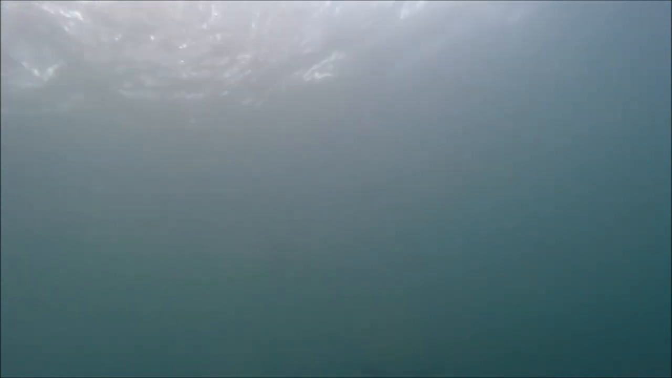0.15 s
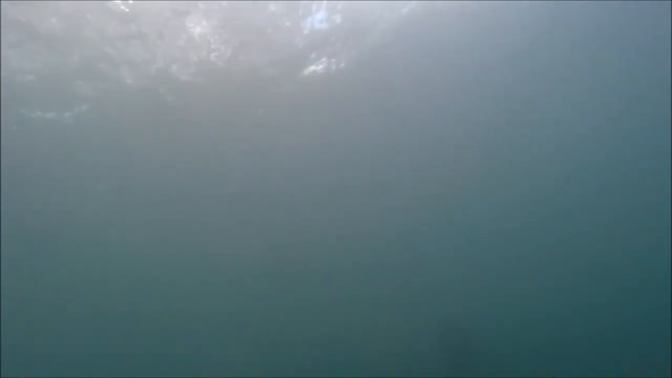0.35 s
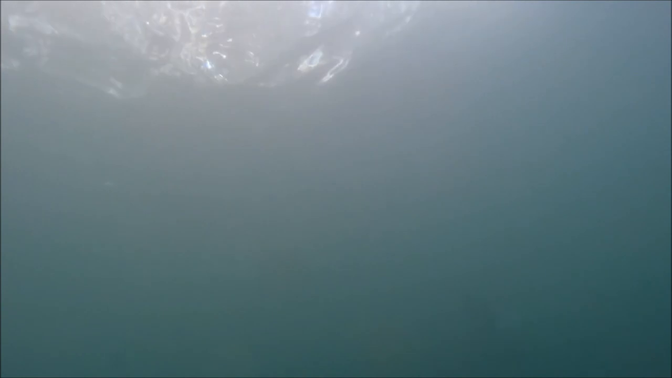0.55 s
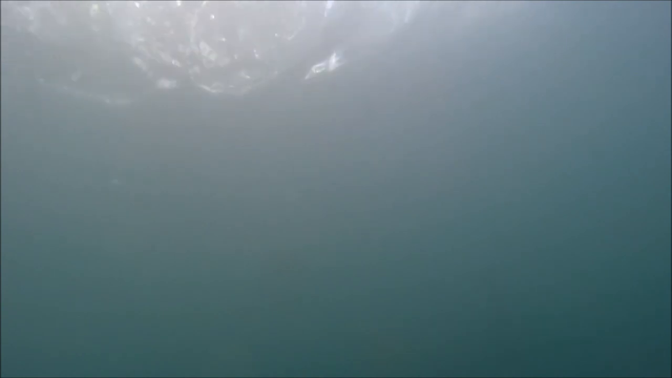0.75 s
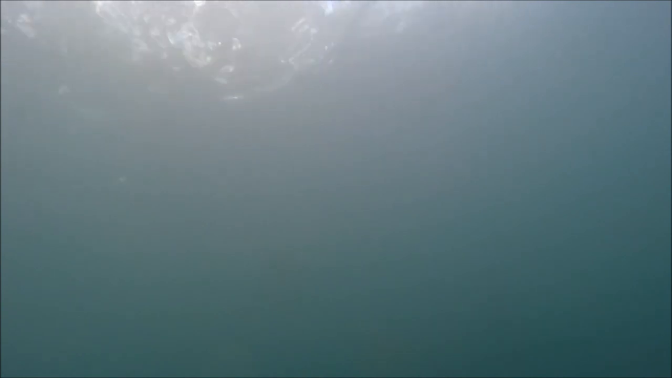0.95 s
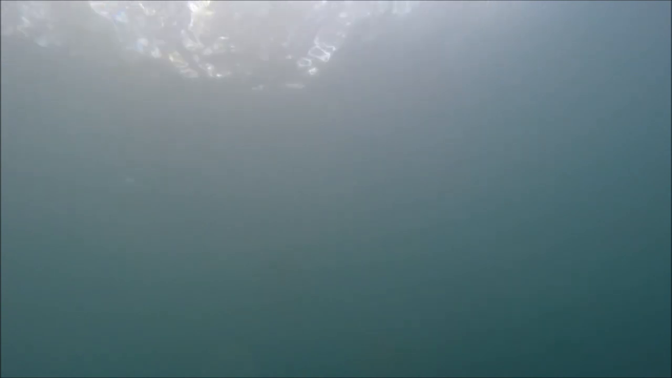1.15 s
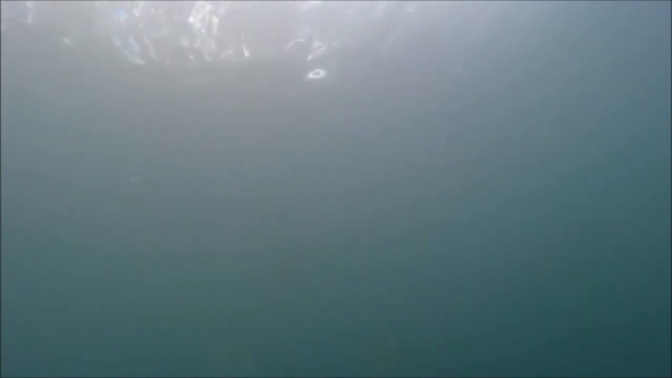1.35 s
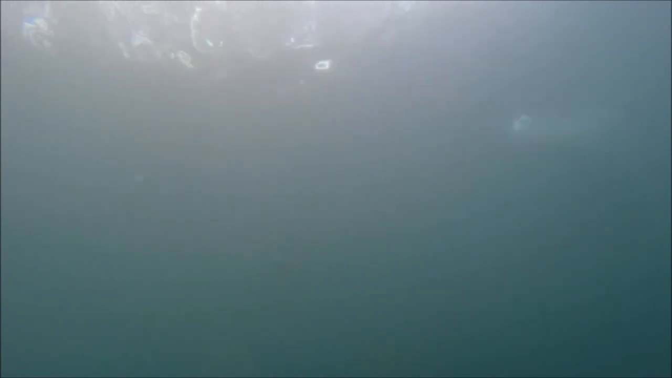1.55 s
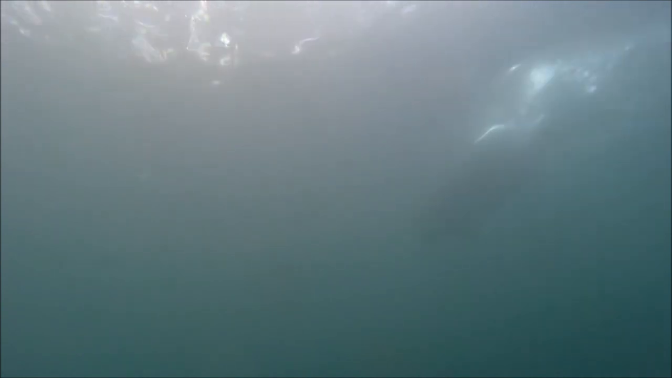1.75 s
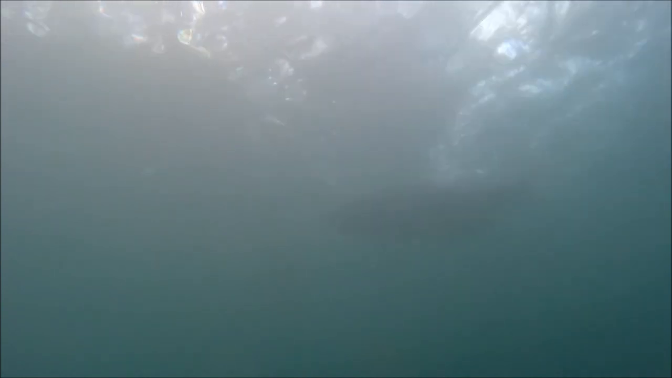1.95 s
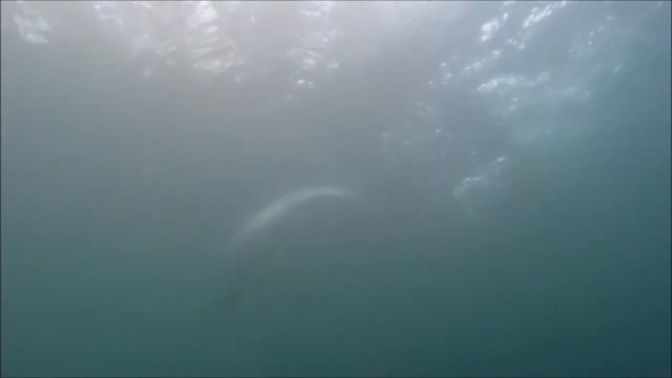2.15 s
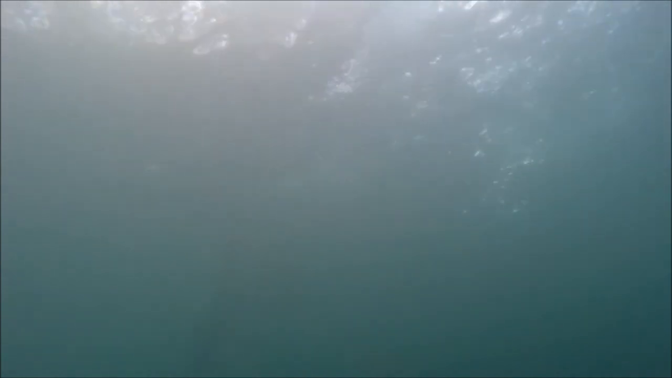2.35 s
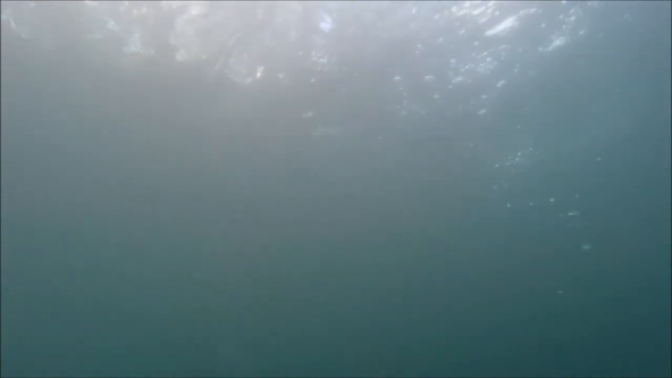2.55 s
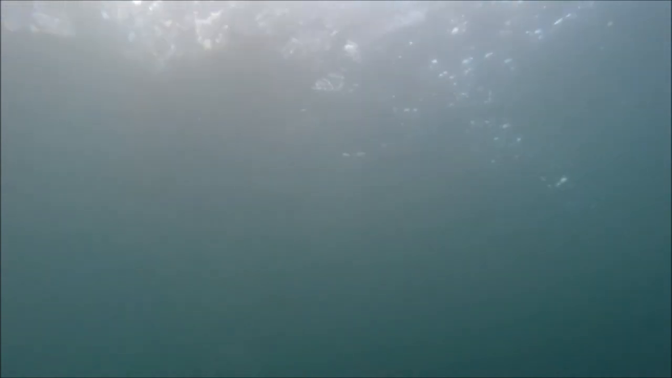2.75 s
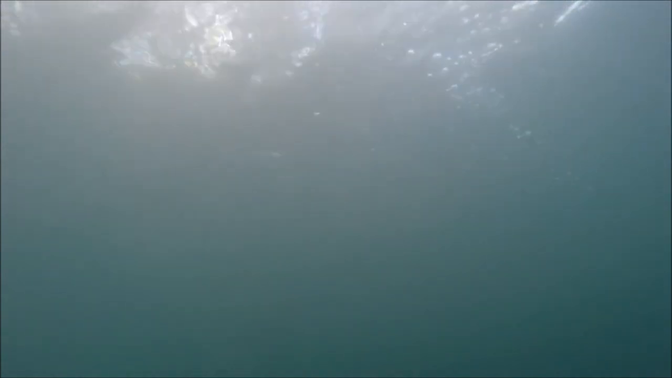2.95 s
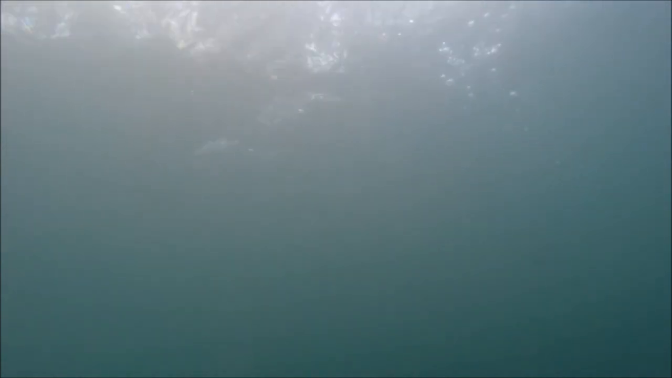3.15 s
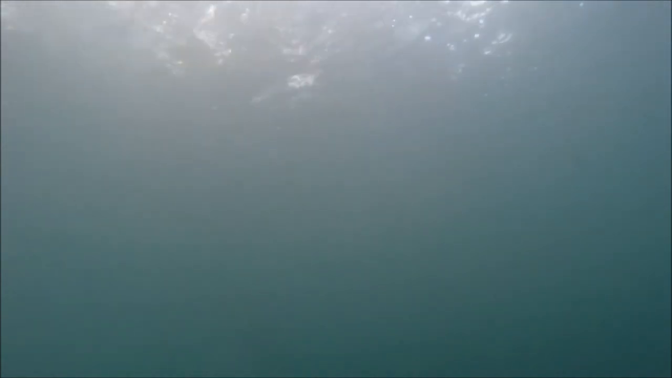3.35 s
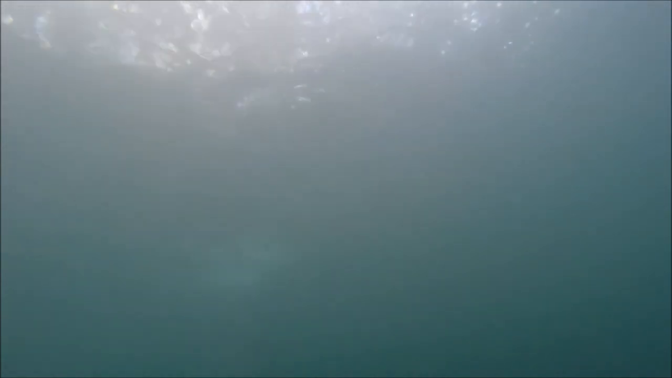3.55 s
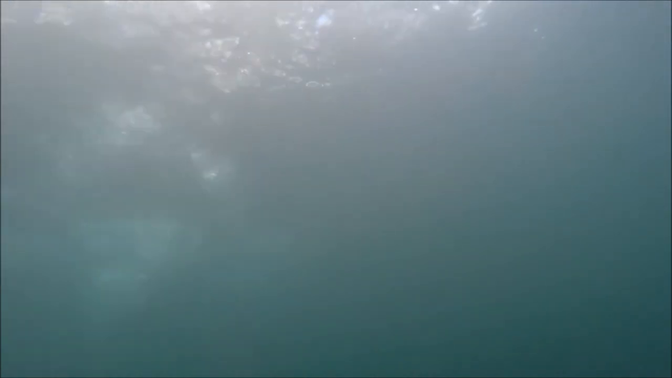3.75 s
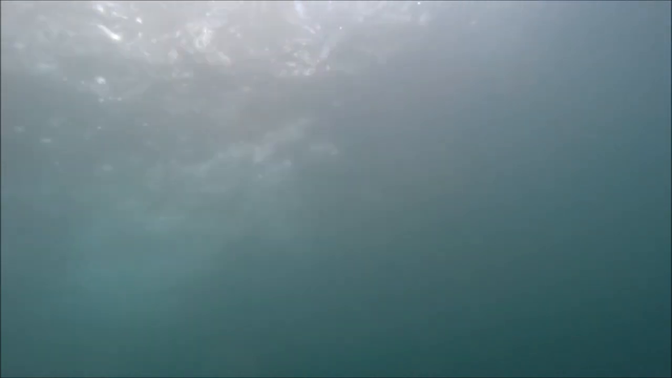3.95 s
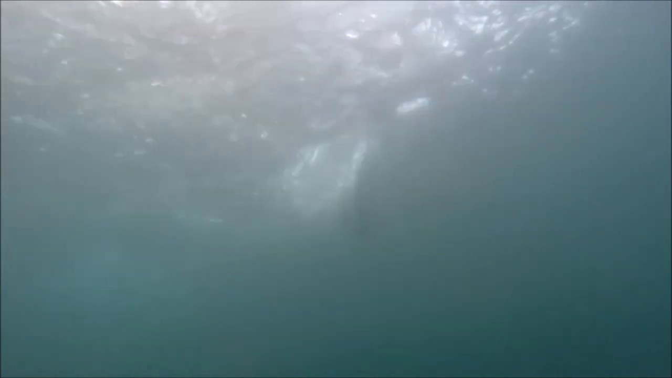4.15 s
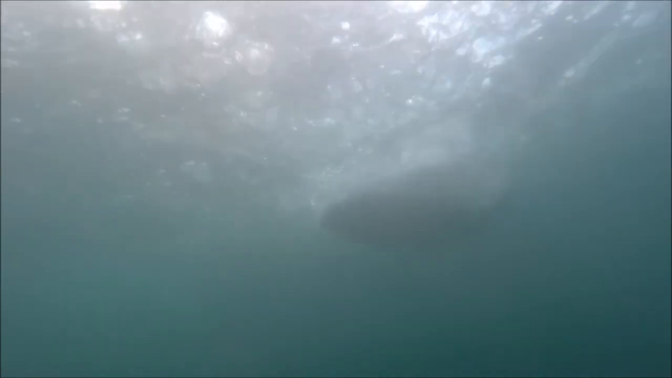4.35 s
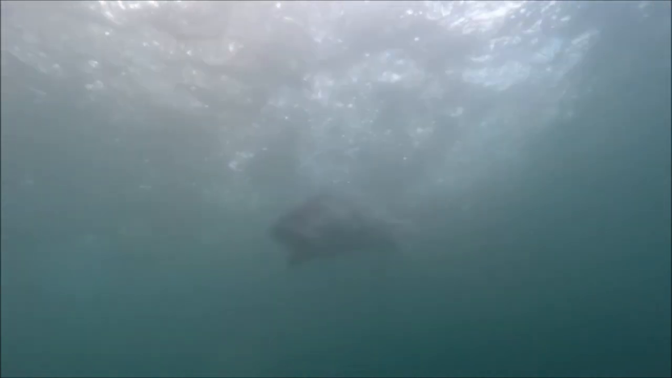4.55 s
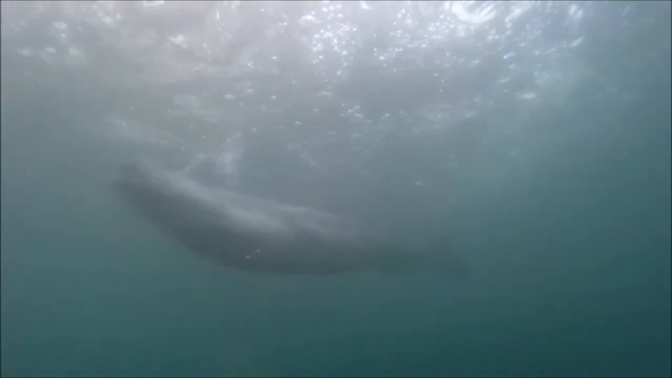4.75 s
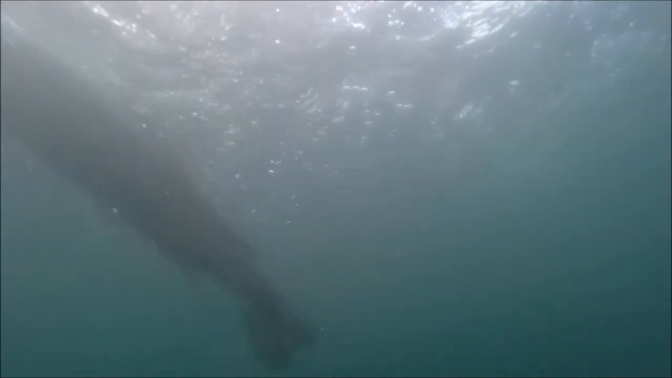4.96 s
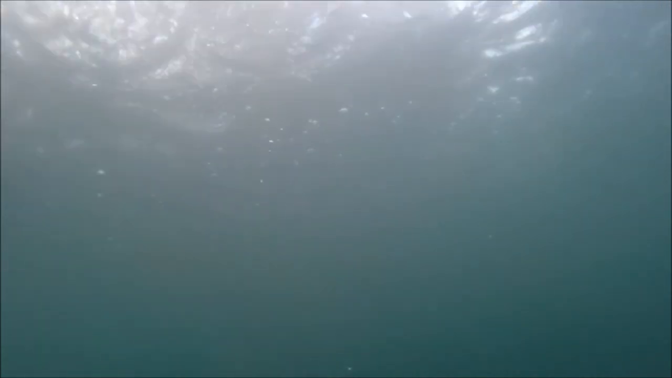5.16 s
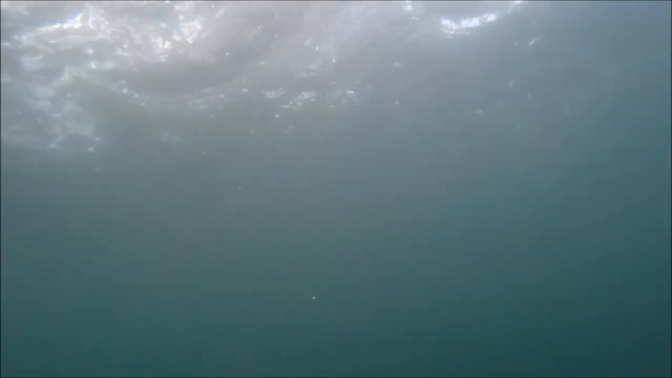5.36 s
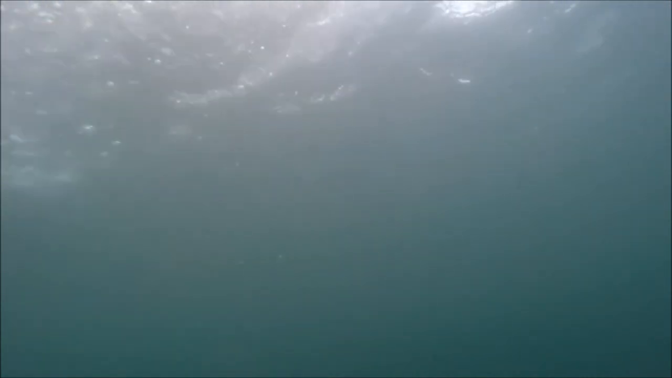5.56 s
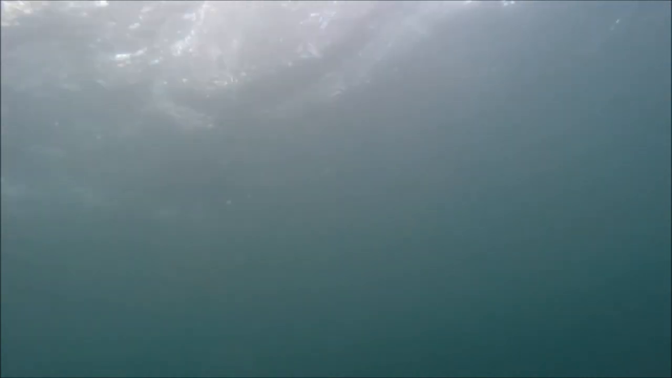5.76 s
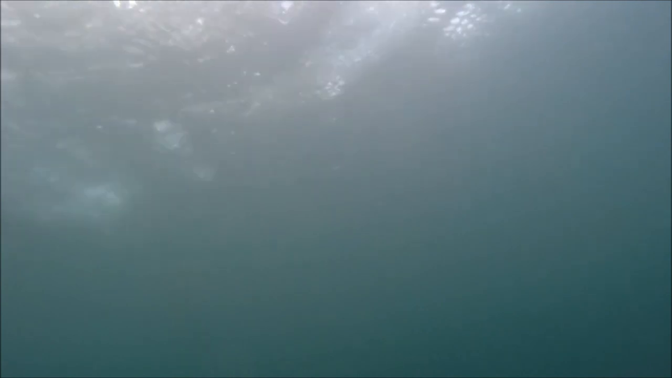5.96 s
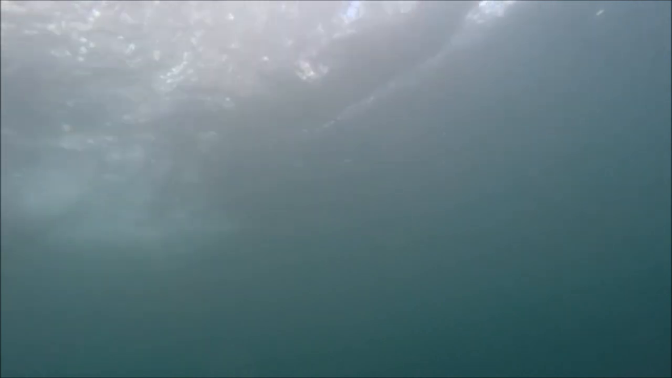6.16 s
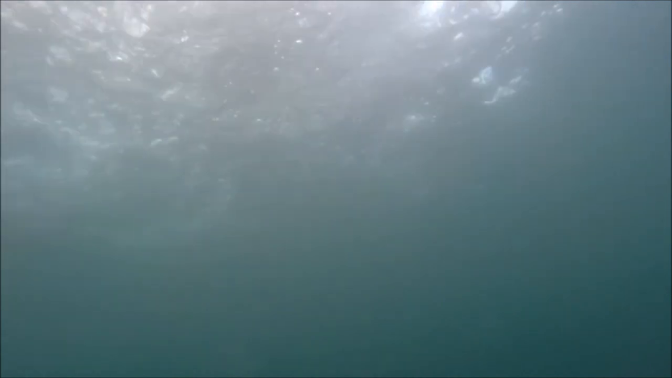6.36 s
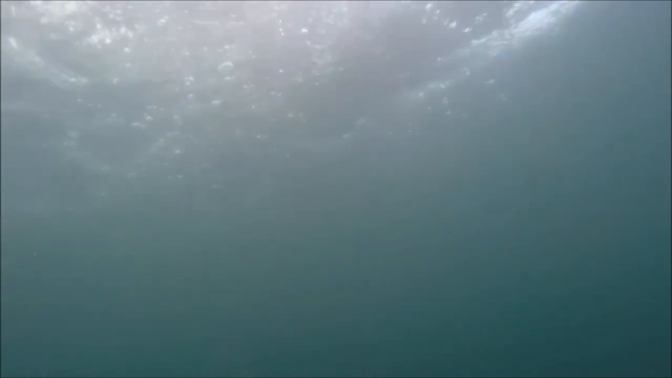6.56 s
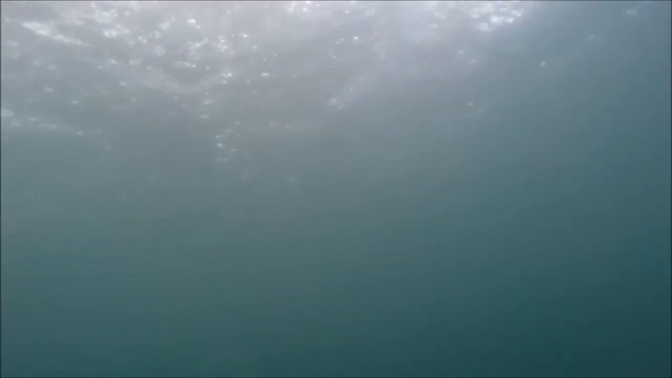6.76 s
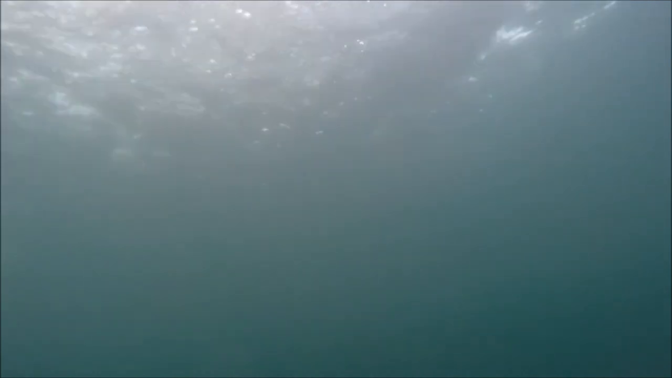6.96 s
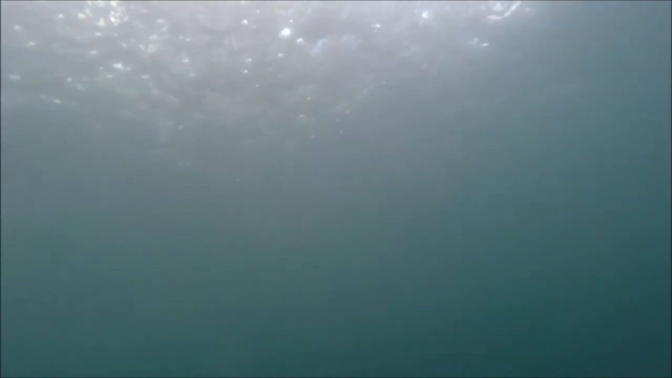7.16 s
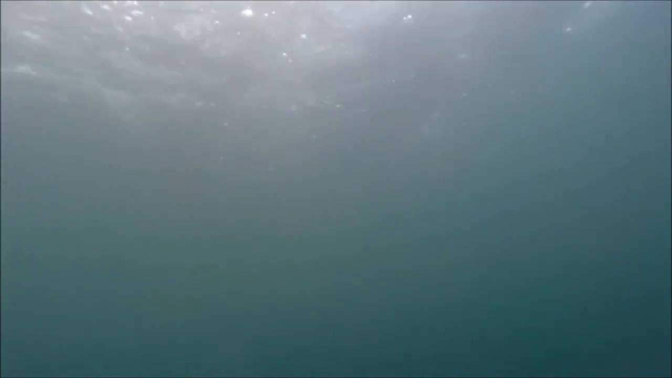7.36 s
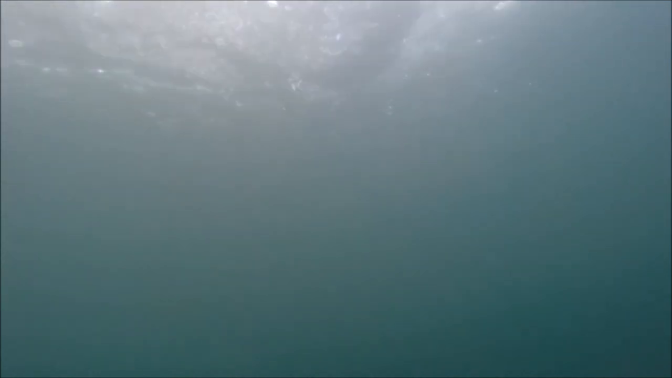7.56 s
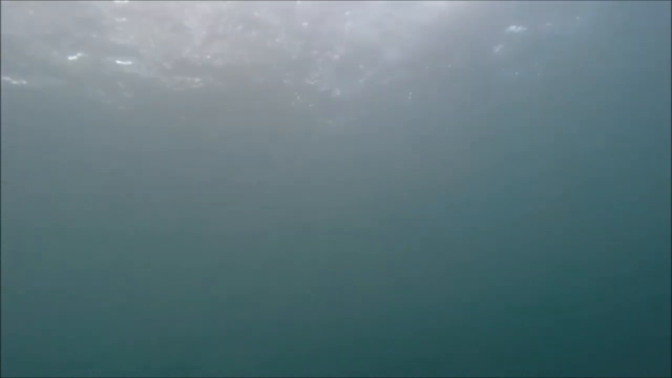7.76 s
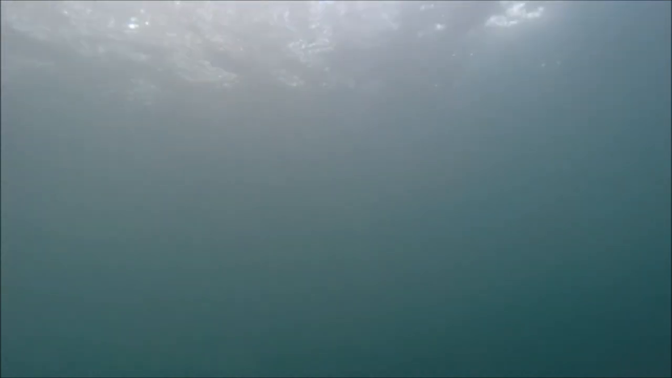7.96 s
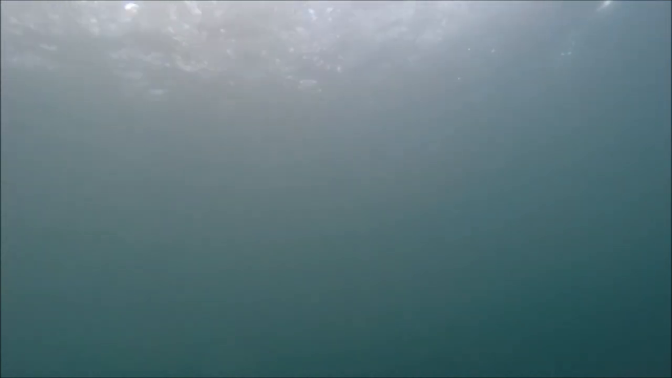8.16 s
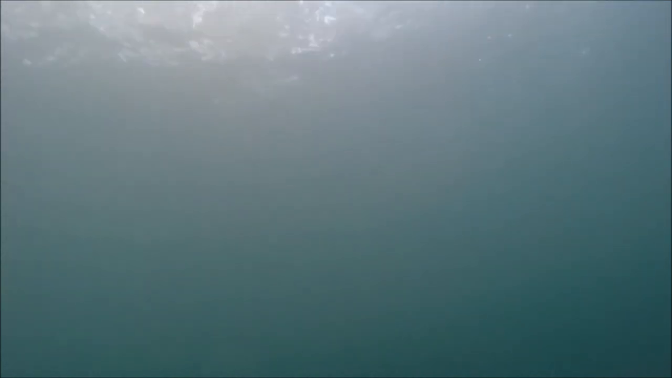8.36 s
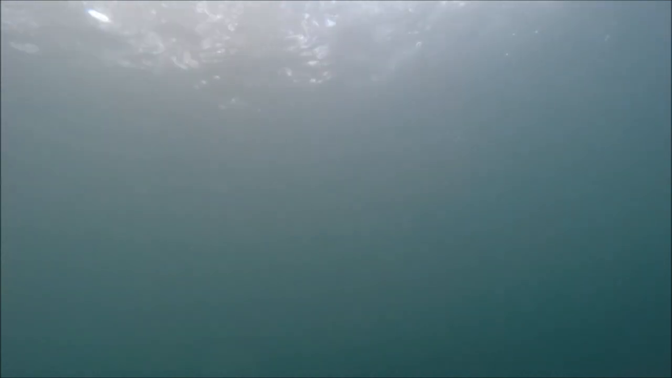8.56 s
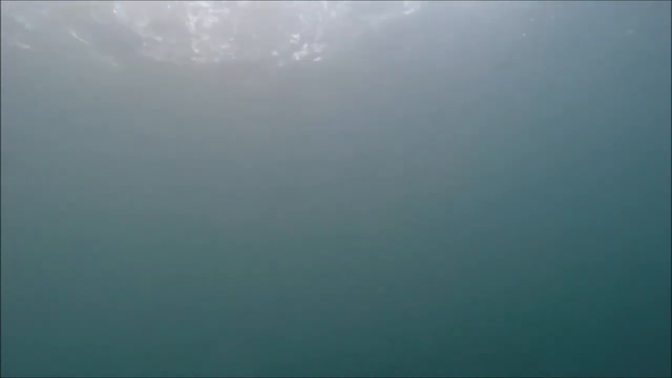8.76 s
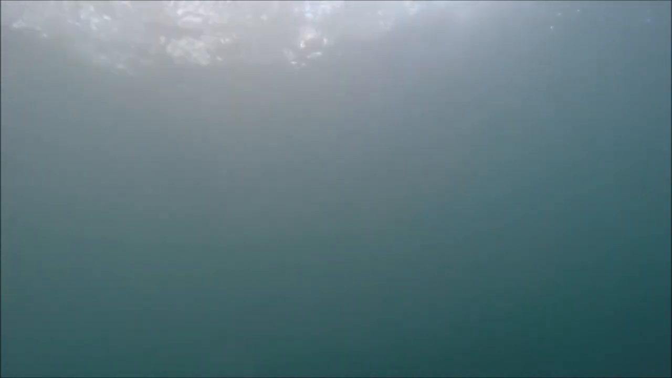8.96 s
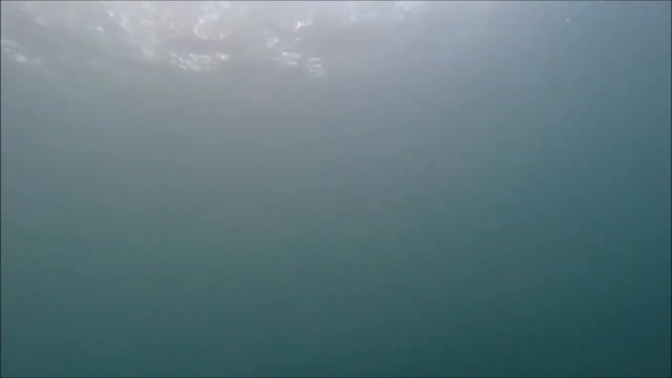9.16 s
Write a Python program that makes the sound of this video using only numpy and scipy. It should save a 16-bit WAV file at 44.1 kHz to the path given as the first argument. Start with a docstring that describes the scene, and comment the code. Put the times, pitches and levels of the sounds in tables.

```python
"""Under water, inside a camera housing on a pole: seals break the surface and dive past the microphone.
Each splash traps air: big pockets plop, small near bubbles ping, clouds of them gurgle and fizz.
These are ringing sines, singly or by the thousand; filtered noise makes the far wash and the rumble.
The housing colours much of this; towards the end it is knocked, its shell rings and the pole hums."""
import sys
import numpy as np
from scipy import signal
from scipy.fft import rfft, irfft, next_fast_len
from scipy.io import wavfile
from scipy.ndimage import map_coordinates

SR = 44100
rng = np.random.default_rng(int(sys.argv[2]) if len(sys.argv) > 2 else 0)


def to_wav(sig):
    """Store sig (one row per channel, or 1-D mono) as 16-bit WAV at the path in sys.argv[1].

    Samples outside -1..1 are clipped; the rate is SR.
    """
    pcm = np.clip(np.atleast_2d(sig), -1, 1) * 32767
    pcm = np.round(pcm).astype(np.int16)
    wavfile.write(sys.argv[1], SR, pcm.T)  # frames by channels


N = 406602  # length in samples
TOP_HZ = 15600  # upper band limit of the microphone

# knocks on the housing: start_s, peak_db, brightness_hz,
# ring_db (shell ring, relative to the contact noise), swing_db (swing of the pole, relative)
HOUSING_KNOCKS = [(6.507, -55, 900, -5, -40), (7.1424, -13.5, 1580, 3.5, -39),
                  (7.338, -44, 1520, -6, -42.5), (7.504, -26.5, 1530, -4, -52.5),
                  (7.557, -37.5, 1400, 0, -43), (8.182, -33.5, 4180, -7.5, -49),
                  (8.2545, -28, 1850, -28, -32.5), (8.47, -33, 925, -18, -51),
                  (8.6031, -21, 5200, 5, -38.5), (9.0707, -2, 2570, 5, -31.5)]
# spectral shape of spray: frequency_hz, relative_db
SPRAY_SPECTRUM = [(300, -25.5), (1100, 2.5), (1800, -1), (3000, 3.5), (4500, 3), (9000, -21)]


def amp(db):
    """Decibels to gain."""
    return 10 ** (np.asarray(db) / 20)


def unit(x):
    """Scale to rms 1."""
    return x / np.sqrt(np.mean(x ** 2) + 1e-20)


def curves(rows):
    """Straight lines between the rows: one value per sample for each column after the time."""
    s, *columns = np.transpose(rows)
    return [np.interp(np.arange(N) / SR, s, column) for column in columns]


def wobble(rate):
    """A smooth random curve, rate knots a second."""
    knots = rng.standard_normal(int(N * rate / SR) + 4)
    return map_coordinates(knots, [np.arange(N) * rate / SR])


def add(track, s, sound):
    """Mix a sound into a track at time s."""
    start = round(s * SR)
    track[start:start + len(sound)] += sound[:N - start]


def colour(x, spectrum, resonance=0):
    """Minimum-phase filter, output at rms 1: a smooth spectrum plus a share of the housing's resonances."""
    # resonances through which the housing hears the water: centre_hz, width_hz, lift_db (at a share of 1)
    housing_modes = [(760.5, 153, 25.5), (1079, 190, 13), (1410, 156, 11), (2600, 544, 14),
                     (3560, 160, 9.5), (3924, 220, 8), (4690, 200, 6.5), (6070, 740, 13), (6910, 120, 9)]
    m = 2 * next_fast_len(N // 2 + SR // 4)
    hz = np.fft.rfftfreq(m, 1 / SR)
    knot_hz, knot_db = np.transpose(spectrum)
    db = np.interp(np.log(hz + 1), np.log(knot_hz), knot_db)
    for centre, width, lift in housing_modes:
        db = db + resonance * lift / (1 + (2 * (hz - centre) / width) ** 2)
    # keeping only the positive half of the cepstrum makes the filter causal
    cepstrum = irfft(np.log(amp(db)))[:m // 2]
    response = np.exp(rfft(2 * cepstrum, m))
    return unit(irfft(rfft(x, m) * response)[:N])


def crackle(rate, spread_db):
    """Random impulses of uneven size and either sign, rate a second."""
    count = int(rate * N / SR)
    size_db = spread_db * np.minimum(rng.exponential(size=count), 4)
    size = amp(size_db) * rng.choice([-1, 1], count)
    return unit(np.bincount(rng.integers(0, N, count), size, N))


def bubble(t, hz, t60, rise, onset):
    """A trapped air pocket rings and dies away; pitch glides by rise (octaves per s at first), onset in cycles."""
    phase = 2 * np.pi * hz * t * (1 + np.log(2) * rise * t / 2)
    swell = 1 - np.exp(-(t * hz / onset) ** 2)
    return np.sin(phase) * amp(-60 * t / t60) * swell


def cloud(centre_hz, scatter, cycles, spread_db, count):
    """Many small bubbles of random time, pitch, life (about cycles long) and size."""
    t = np.arange(int(2 * SR * cycles / centre_hz)) / SR
    pitch, life, size = rng.standard_normal((count, 3)).T[..., None]
    hz = centre_hz * np.exp(scatter * pitch)
    t60 = cycles * np.exp(life / 2) / hz
    gain = amp(spread_db * np.clip(size, -2, 2)) * (hz < TOP_HZ)
    grains = gain * bubble(t, hz, t60, rise=3.4, onset=0.86)
    places = rng.integers(0, N, (count, 1)) + np.arange(len(t))
    return unit(np.bincount(places.ravel(), grains.ravel(), N)[:N])


def bursts(times, levels, t60, attack):
    """An envelope that leaps at each time and dies away."""
    envelope, t = np.zeros(N), np.arange(SR // 2) / SR
    shape = amp(-60 * t / t60) * (1 - np.exp(-t / attack))
    for s, db in zip(times, levels):
        add(envelope, s, amp(db) * shape / shape.max())
    return envelope


def swells(times, levels, t60s):
    """An envelope that builds smoothly after each time, then thins out as the air escapes."""
    rise_s = 0.047
    power, t = np.zeros(N), np.arange(3 * SR) / SR
    for s, db, t60 in zip(times, levels, t60s):
        fade = amp(db - 60 * np.maximum(t - rise_s, 0) / t60)
        build = 1 - np.exp(-(t / rise_s) ** 2)
        add(power, s, (fade * build) ** 2)
    return np.sqrt(power)


def churn():
    """Every dive leaves a cloud that fizzes, gurgles and fades; every slap adds a thud and a burst of spray."""
    # dives, each dragging down a cloud of air: start_s, gurgle_db, foam_db (both relative), t60_s
    dives = [(1.93, -42.5, -55.5, 1.36), (2.1, -45, -68, 1.6), (3.62, -47, -60.5, 6),
             (3.929, -32, -70, 0.85), (4.27, -37, -56, 1.94), (4.5, -43, -55.5, 0.97),
             (4.83, -66, -50.5, 0.96), (5.2, -48.5, -61.5, 4.8), (5.52, -32.5, -52, 1.9),
             (6.07, -38.5, -53.5, 2.1), (6.77, -42.5, -56.5, 3.1), (7.2, -41, -57, 0.4)]
    # slaps on the surface: start_s, thud_db, spray_db, fizz_db (all relative)
    slaps = [(1.996, -20, -55, -52), (2.029, -21, -42, -47.5), (2.049, -15, -43.5, -54),
             (3.758, -26, -35, -51), (3.895, -14, -33.5, -44), (4.352, -21.5, -53, -49),
             (4.481, -11.5, -41, -52), (4.817, -30.5, -29, -53), (4.886, -41, -59, -70),
             (4.911, -38, -26.5, -47), (5.446, -18.5, -28.5, -46), (5.549, -16.5, -32, -43),
             (5.57, -3.5, -58, -58), (5.828, -10, -30.5, -53), (5.979, -22, -32.5, -51),
             (6.089, -10.5, -30.5, -50), (6.209, -23, -42, -64), (6.444, -20, -66, -59),
             (6.807, -26.5, -35, -50.5), (6.933, -22, -61, -55)]
    # spectral shapes of slap, gurgle, fizz and finest foam: frequency_hz, relative_db
    slap_spectrum = [(40, 18), (130, -5.5), (400, 6.5), (750, 4), (1100, -12), (1700, -13), (3000, -29),
                     (6000, -63), (15000, -120)]
    gurgle_spectrum = [(40, 12), (200, -13), (400, -5), (800, 4.5), (1100, -9), (1500, 5.5), (2200, -46),
                       (5000, -93), (15000, -110)]
    fizz_spectrum = [(600, -49), (1800, 8), (3000, -3.5), (4700, -17), (5300, -5), (7800, 4), (10500, 6.5),
                     (12500, -8), (15500, 3)]
    hiss_spectrum = [(800, -38), (1800, -12), (3000, -3), (5200, 1), (7800, -14), (10500, -9), (12500, -10),
                     (15500, -42)]
    gurgle_lag_s = 0.01  # big bubbles form after the foam
    lead_s, lead_db = 0.034, -27  # a little foam runs ahead of the body; level against the spray
    slap_t60_s, spray_t60_s = 0.14, 0.12

    start, gurgle_db, foam_db, t60 = np.transpose(dives)
    s, thud_db, spray_db, fizz_db = np.transpose(slaps)
    stir = swells(start + gurgle_lag_s, gurgle_db, t60)
    clumps = amp(1.5 * wobble(28))  # foam bursts in clumps
    foam = swells(start, foam_db, t60) * clumps
    foam = foam + bursts(s - lead_s, spray_db + lead_db, spray_t60_s, attack=.02)

    slap = colour(crackle(2500, spread_db=-1.0), slap_spectrum, resonance=0.34)
    # a high-pass keeps the slap's noise out of the deep bass
    bass_cut = signal.butter(2, 75, "highpass", fs=SR, output="sos")
    slap = signal.sosfilt(bass_cut, slap)

    # the smaller the bubble, the higher and shorter its note
    gurgle = cloud(638, scatter=0.571, cycles=15.0, spread_db=2.5, count=5000)
    gurgle = colour(gurgle, gurgle_spectrum, resonance=0.46)
    # single bubbles that stand out of the gurgle
    gurgle = gurgle + amp(-10) * cloud(520, scatter=0.27, cycles=47, spread_db=1.0, count=900)

    coarse = cloud(1970, scatter=0.508, cycles=32, spread_db=7.0, count=8000)
    coarse = colour(coarse, SPRAY_SPECTRUM, resonance=0.42)
    fine = cloud(2900, scatter=0.49, cycles=14.0, spread_db=5, count=22000)
    fine = colour(fine, SPRAY_SPECTRUM, resonance=1.0)
    spray = 0.86 * coarse + 0.28 * fine

    # single bubbles that stand out of the foam
    strays = cloud(2120, scatter=.4, cycles=37, spread_db=1.5, count=1200)

    fizz = cloud(6040, scatter=0.525, cycles=24, spread_db=3.5, count=15000)
    fizz = colour(fizz, fizz_spectrum, resonance=1.0)
    # the finest foam merges into a hiss
    hiss = colour(crackle(12000, spread_db=4.0), hiss_spectrum, resonance=0.64)
    fizz = 0.75 * fizz + 0.31 * hiss

    slap_envelope = bursts(s, thud_db - 14.0, slap_t60_s, attack=0.0039)
    spray_envelope = amp(6.5) * foam + bursts(s, spray_db - 6.5, spray_t60_s, attack=0.0078)
    fizz_envelope = amp(2.0) * foam + bursts(s, fizz_db, spray_t60_s, attack=0.0016)
    return (stir * gurgle + amp(1) * foam * strays + slap_envelope * slap
            + spray_envelope * spray + fizz_envelope * fizz)


def plops():
    """Large air pockets pinch off with a short plop; each leaves a weaker bubble that sings on."""
    # large bubbles: start_s, peak_db (of the plop alone), pitch_hz, t60_s, rise_octaves_per_s
    large_bubbles = [(1.918, -21, 288.5, 0.068, 16), (2.063, -18.5, 763, 0.085, 1.5),
                     (2.153, -30.5, 760, 0.037, -4), (2.226, -35.5, 830, 0.023, -1),
                     (3.643, -27.5, 646, 0.069, 6), (3.674, -28.5, 757, .04, -8),
                     (3.912, -26.5, 625, 0.091, 15), (3.98, -20.5, 530, 0.034, 5),
                     (4.013, -32.5, 369, 0.29, -2.5), (4.297, -32.5, 55, 0.042, -14),
                     (4.358, -14.5, 280, .01, 1), (4.379, -32, 1008, 0.11, 2.5),
                     (4.486, -15, 685, 0.051, 12.5), (4.55, -29.5, 678, 0.13, 0.5),
                     (4.58, -20.5, 737, 0.052, 6), (4.555, -34, 430, 0.2, 2.5),
                     (4.738, -29.5, 795, 0.065, -0.5), (4.779, -30, 803, 0.049, 13),
                     (4.847, -22, 835, 0.058, 5), (5.472, -17.5, 808, 0.088, 2.5),
                     (5.53, -14.5, 192, 0.048, 19), (5.549, -12, 322, 0.041, 4),
                     (5.573, -16, 446, 0.0072, 2), (5.585, -16, 311, 0.16, 2.5), (5.605, -22, 641, 0.14, 5),
                     (5.774, -21, 575, 0.059, 0), (5.807, -20.5, 375, 0.011, 64),
                     (5.837, -18, 599, 0.13, 2), (5.982, -10.5, 682, .025, 30), (6.094, -20, 680, 0.033, 2),
                     (6.167, -23.5, 763, 0.084, 3), (6.465, -20, 688, 0.05, 18.5),
                     (6.478, -24, 740, 0.11, 5.5), (6.764, -28, 413, 0.013, 2), (6.803, -33, 448, .24, 2),
                     (6.833, -23, 803, .09, 6), (6.943, -27, 782, 0.16, 3), (7.035, -25.5, 549, 0.16, 9.5),
                     (7.036, -22, 756, 0.06, 11)]
    # the bubble left behind: level, ratios of pitch and life to the plop's, octaves per s
    after_db, after_pitch, after_life, after_rise = -26, 1.06, 4.7, 3
    track, t = np.zeros(N), np.arange(SR // 3) / SR
    for s, db, hz, t60, rise in large_bubbles:
        ring = bubble(t, hz, t60, rise, onset=0.58)
        ring = ring / np.abs(ring).max()
        after = bubble(t, after_pitch * hz, after_life * t60, after_rise, onset=8)
        add(track, s, amp(db) * (ring + amp(after_db) * after))
    return track


def pings():
    """Small bubbles near the microphone sing for a few dozen cycles."""
    # the nearest small bubbles: start_s, level_db (before onset and decay), pitch_hz
    near_bubbles = [(1.96, -31, 6950), (2.051, -20.5, 1067), (2.24, -36, 2820), (2.826, -36, 2640),
                    (4.679, -31, 1590), (4.739, -31, 3500), (4.842, -30, 4070), (4.912, -23, 3820),
                    (5.468, -19, 1870), (5.592, -19.5, 1230), (5.662, -28.5, 3000), (5.713, -28.5, 6050),
                    (6.004, -30.5, 1800), (6.295, -30, 10500), (6.931, -28.5, 1610), (7.164, -35, 2800)]
    track, t = np.zeros(N), np.arange(SR // 10) / SR
    for s, db, hz in near_bubbles:
        add(track, s, amp(db) * bubble(t, hz, 55 / hz, rise=5.8, onset=2.7))
    return track


def knocks():
    """Each blow rings the shell briefly, scuffs it with rough noise and sets the pole swinging."""
    # modes of the struck shell: frequency_hz, relative_db, t60_s
    shell_modes = [(754, -19, 0.037), (1077, -13, 0.026), (1340, -7, 0.023), (1707, 0, 0.027),
                   (2089, -16, 0.039), (2396, -10, 0.026), (3526, -29, 0.018)]
    # bending modes of the pole: frequency_hz
    pole_hz = [54, 129, 231]
    # the same modes: relative_db, t60_s
    pole_modes = [(1.5, 1.07), (-5.5, 0.17), (-6, 0.16)]
    track, t = np.zeros(N), np.arange(SR) / SR
    for s, db, bright_hz, ring_db, swing_db in HOUSING_KNOCKS:
        shell = 0
        for hz, level, t60 in shell_modes:
            decay = amp(level + rng.normal(0, 1) - 60 * t / t60)  # no two blows excite it alike
            dulling = 1 + (hz / bright_hz) ** 10
            shell = shell + decay * np.sin(2 * np.pi * hz * t) / dulling
        # the rough contact reaches only as high as the blow is bright
        band = signal.butter(8, [.5 * bright_hz, bright_hz], "bandpass", fs=SR, output="sos")
        contact = unit(signal.sosfilt(band, rng.standard_normal(SR)))
        contact = 0.28 * contact * amp(-60 * t / 0.027)
        onset = 1 - np.exp(-(t / 0.001) ** 2)
        blow = (amp(ring_db) * shell + contact) * onset
        pole = sum(amp(level - 60 * t / t60) * np.sin(2 * np.pi * hz * t)
                   for hz, (level, t60) in zip(pole_hz, pole_modes))
        add(track, s, amp(db) * blow / np.abs(blow).max() + amp(swing_db) * pole)
    return track


def thuds():
    """The push that swings the pole also thuds through the housing: short bursts of low-passed noise."""
    s, *_, swing_db = np.transpose(HOUSING_KNOCKS)
    lowpass = signal.butter(3, 296, fs=SR, output="sos")
    dull = unit(signal.sosfilt(lowpass, rng.standard_normal(N)))
    level_db = swing_db - 8.5  # against the pole's swing
    return bursts(s, level_db, t60=.06, attack=0.003) * dull


def bumps():
    """Eddies and big soft air pockets push dully against the housing: bursts of a low bubble cloud."""
    # soft bumps of water on the housing: start_s, relative_db
    soft_bumps = [(2.728, -37), (2.795, -37), (2.861, -39.5), (3.299, -40), (3.527, -36.5), (3.684, -37.5),
                  (4.358, -15.5), (4.486, -27), (4.89, -27.5), (4.912, -32), (4.953, -33), (5.57, -18.5),
                  (5.83, -27), (6.094, -24), (6.937, -35.5), (7.334, -41.5), (8.471, -31)]
    # spectral shape of a bump: frequency_hz, relative_db
    bump_spectrum = [(20, -50), (70, 10), (130, 3.5), (300, -8), (450, -6.5), (800, 0), (1500, -27),
                     (15000, -120)]
    s, db = np.transpose(soft_bumps)
    glug = cloud(255, scatter=.38, cycles=4.5, spread_db=2, count=3500)
    return bursts(s, db - 5.5, t60=0.084, attack=0.004) * colour(glug, bump_spectrum)


def snaps():
    """A few tiny, very bright snaps close by: the briefest bursts of filtered noise."""
    # sharp snaps in the water: start_s, relative_db
    sharp_snaps = [(1.185, -40), (2.567, -33.5), (7.28, -35)]
    # spectral shape of a snap: frequency_hz, relative_db
    snap_spectrum = [(1000, -25), (3500, -11), (7000, -5), (12000, -3.5), (16000, -20)]
    s, db = np.transpose(sharp_snaps)
    noise = colour(rng.standard_normal(N), snap_spectrum, resonance=0.51)
    return bursts(s, db - 8.0, t60=0.012, attack=.0005) * noise


def wash():
    """Countless far bubbles blend into a steady hiss; slow water rumbles past the housing."""
    # hiss of distant bubbles: time_s, level_db (before the flicker)
    distant_hiss = [(0, -52.5), (.7, -52), (1.7, -51), (3, -51), (3.5, -52), (5.1, -55.5), (6.5, -53),
                    (7.8, -50.5), (8.4, -51), (9.2, -52.5)]
    # water moving round the housing: time_s, relative_db
    water_swell = [(0, -73), (1.8, -58), (2.1, -70), (3.1, -61), (4.2, -52.5), (4.4, -44), (4.7, -59),
                   (5.3, -55.5), (5.6, -44.5), (6.3, -52.5), (9.2, -58.5)]
    # spectral shapes of hiss and rumble: frequency_hz, relative_db
    wash_spectrum = [(30, 3.5), (120, 3.5), (300, -4.5), (600, -10), (1300, -10), (1900, -11), (3200, -15),
                     (5200, -22), (7800, -22.5), (9500, -21.5), (11500, -30), (15000, -30.5)]
    rumble_spectrum = [(15, -8), (55, 4.5), (130, -9.5), (250, -17.5), (600, -30), (2000, -80)]
    blips = cloud(2168, scatter=0.587, cycles=16, spread_db=6.5, count=2000)
    blips = colour(blips, SPRAY_SPECTRUM, resonance=0.59)
    far = colour(rng.standard_normal(N), wash_spectrum, resonance=0.92)
    far = (far + .2 * blips) * amp(.4 * wobble(14))
    flow = colour(rng.standard_normal(N), rumble_spectrum)
    hiss_db = curves(distant_hiss)[0]
    flow_db = curves(water_swell)[0] - 0.5 + 1.1 * wobble(7)
    return amp(hiss_db) * far + amp(flow_db) * flow


def scene():
    """Everything reaches the one microphone inside the housing."""
    return (wash() + churn() + plops() + pings() + bumps() + snaps() + knocks() + thuds())[None]


def record(dry):
    """The microphone rolls off the slowest pressure changes and keeps nothing above its band limit."""
    low_cut = signal.butter(2, 22, "highpass", fs=SR, output="sos")
    dry = signal.sosfilt(low_cut, dry)
    m = next_fast_len(N + SR // 2)
    passed = np.fft.rfftfreq(m, 1 / SR) < TOP_HZ
    return irfft(rfft(dry, m) * passed, m)[..., :N]


dry = scene()
out = record(dry)
to_wav(out)
```